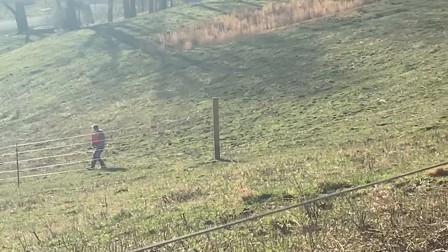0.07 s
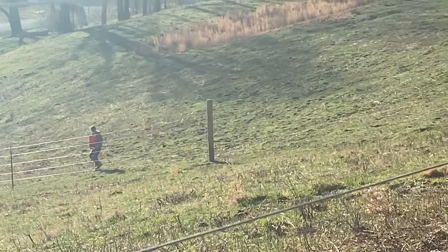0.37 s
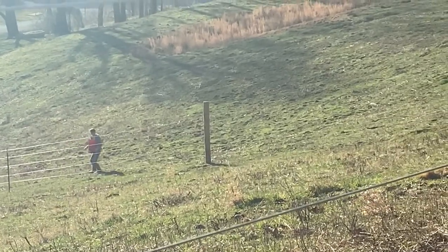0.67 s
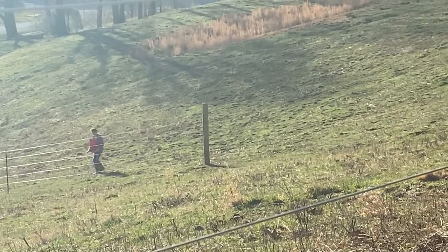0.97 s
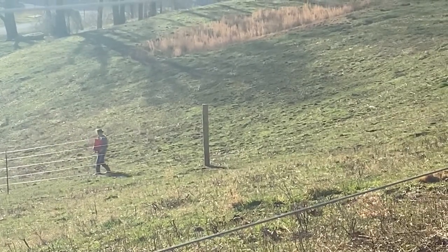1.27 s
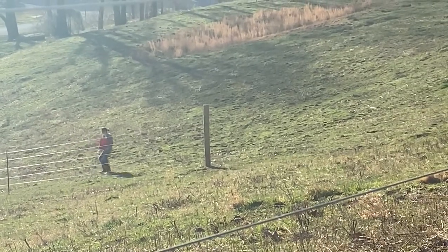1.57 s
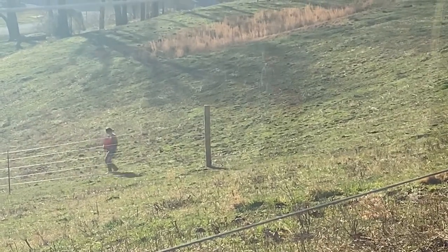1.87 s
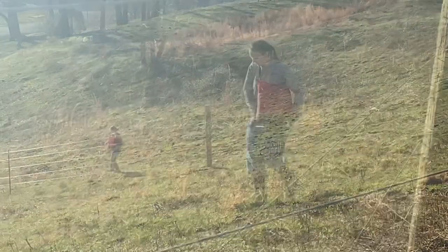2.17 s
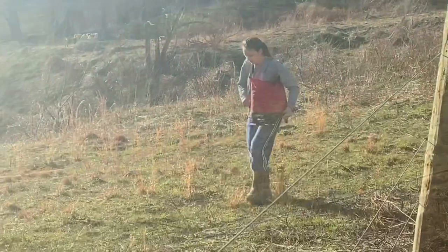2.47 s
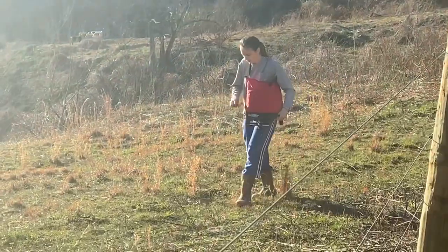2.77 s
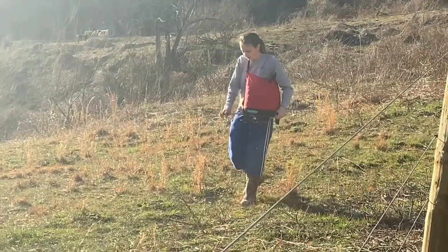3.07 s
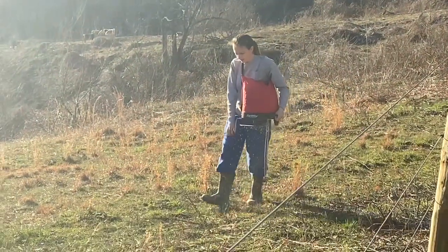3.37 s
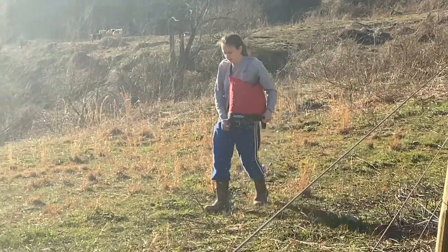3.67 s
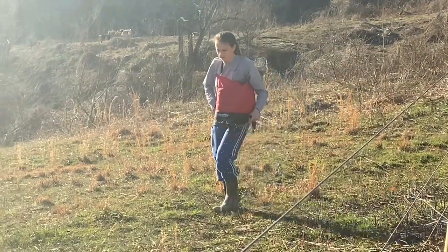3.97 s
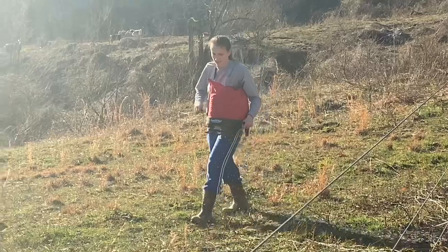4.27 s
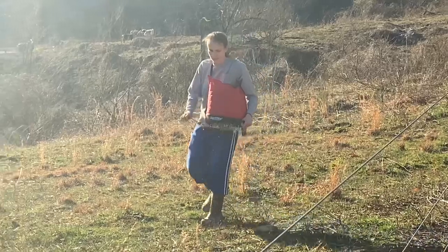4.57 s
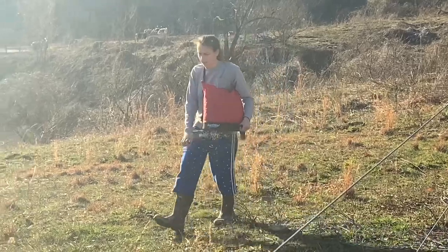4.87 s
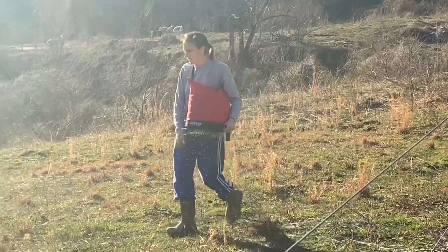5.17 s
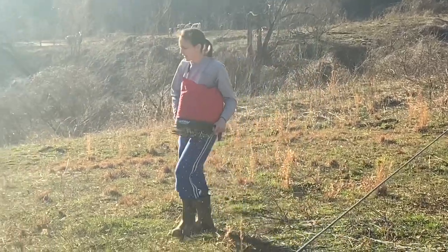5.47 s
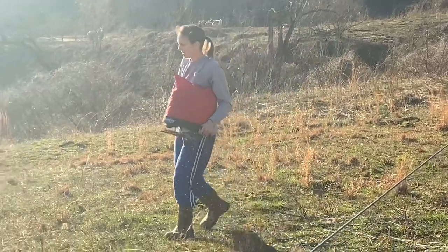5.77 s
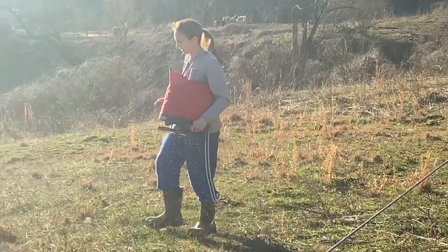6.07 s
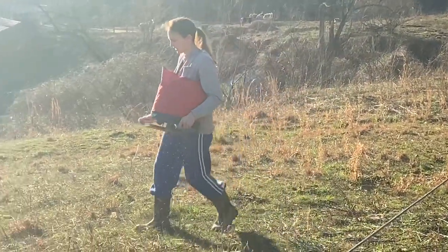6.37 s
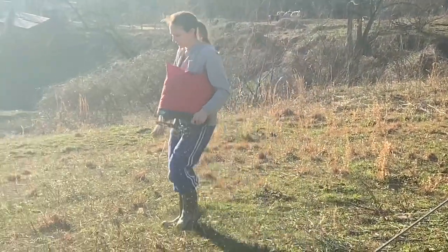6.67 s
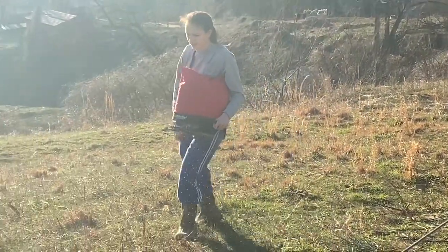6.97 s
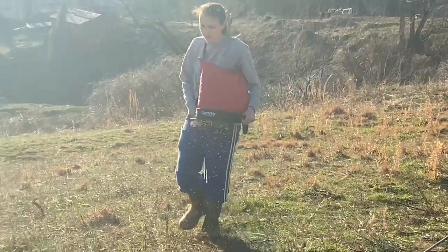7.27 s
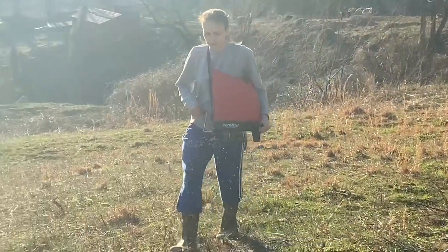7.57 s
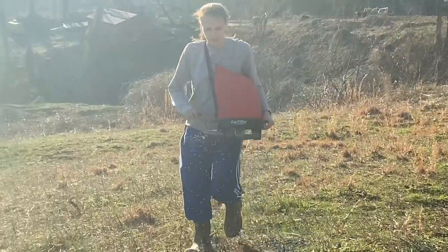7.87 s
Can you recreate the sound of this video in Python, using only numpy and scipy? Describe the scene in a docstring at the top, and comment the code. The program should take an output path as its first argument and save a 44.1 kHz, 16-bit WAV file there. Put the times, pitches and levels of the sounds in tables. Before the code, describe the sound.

In an open pasture, wind rumbles softly on the microphone while a hand-cranked seed spreader is barely heard far off. After about two seconds it is suddenly nearer: a grainy hiss with sharp ticks of seed on plastic and a faint gear whirr, growing louder. Distant tyres roar, an engine hums and a bird chirps faintly. Near the end, strong gusts thump and pop on the microphone.

```python
"""A hand-cranked seed spreader, carried across a pasture, first far from the microphone, then near.
Seed sprays off its spinning disc as a grainy hiss with single sharp ticks, over the whirr of its gears.
Tyres roar on a distant road, an engine and a hollow drone hum far away, a bird chirps and dry grass stirs.
Wind buffets the microphone, hardest near the end, among footstep rustles and a few pops and knocks."""
import sys
import numpy as np
from scipy import signal
from scipy.fft import rfft, irfft, next_fast_len
from scipy.io import wavfile
from scipy.ndimage import uniform_filter1d, map_coordinates

SR = 44100
rng = np.random.default_rng(int(sys.argv[2]) if len(sys.argv) > 2 else 0)


def generate_wav(sig):
    """Save sig (samples, or channels by samples) to the path in sys.argv[1] as 16-bit PCM at SR."""
    pcm = np.round(np.clip(np.atleast_2d(sig).T, -1, 1) * 32767).astype(np.int16)
    wavfile.write(sys.argv[1], SR, pcm)


N = 358091
TOP_HZ = 15800  # upper band limit


def amp(db):
    """Decibels to gain."""
    return 10 ** (np.asarray(db) / 20)


def unit(x):
    """Scale to rms 1."""
    return x / np.sqrt(np.mean(x ** 2) + 1e-20)


def clock():
    """Time of every sample in seconds."""
    return np.arange(N) / SR


def curves(rows):
    """One value per sample for each column after the time."""
    times, *columns = np.transpose(rows)
    return [np.interp(clock(), times, column) for column in columns]


def wobble(rate):
    """A smooth random curve, rate knots a second."""
    knots = rng.standard_normal(int(N * rate / SR) + 4)
    return map_coordinates(knots, [np.arange(N) * rate / SR])


def swell(s, half):
    """A bell-shaped rise and fall around time s."""
    return np.exp(-np.minimum(((clock() - s) / half) ** 2 / 2, 50))


def with_swells(steady, rows):
    """A gain with (time_s, half_length_s, level_db) swells added in power."""
    return np.sqrt(steady ** 2 + sum((amp(db) * swell(s, half)) ** 2 for s, half, db in rows))


def filtered(x, response):
    """x through a filter given as a function of frequency."""
    size = next_fast_len(N + 8192)
    return irfft(rfft(x, size) * response(np.fft.rfftfreq(size, 1 / SR)), size)[..., :N]


def coloured(x, points):
    """x shaped by a (frequency_hz, gain_db) spectrum, at rms 1."""
    points_hz, db = np.transpose(points)
    return unit(filtered(x, lambda hz: amp(np.interp(np.log(hz + 1), np.log(points_hz), db))))


def hump(hz, centre, width):
    """A resonance applied twice, for steep sides."""
    return (hz * width) ** 2 / ((centre ** 2 - hz ** 2) ** 2 + (hz * width) ** 2)


def noise(side_db, size=N):
    """Stereo white noise; side_db sets how much the channels differ."""
    mid, side = rng.standard_normal((2, size))
    return unit(np.array([mid + amp(side_db) * side, mid - amp(side_db) * side]))


def patchy(x, depth_db):
    """Brief, narrow patches of the spectrum grow louder or softer at random."""
    spectra = signal.stft(x, nperseg=1024)[2]
    patches = uniform_filter1d(rng.standard_normal(spectra.shape[1:]), size=5, axis=0)
    patches = unit(uniform_filter1d(patches, size=3, axis=1))
    return unit(signal.istft(spectra * amp(depth_db * patches), nperseg=1024)[1][:, :N])


def hand_push(lag_s=0, hardest_s=5.05, turn_s=0.757):
    """The hand's effort over each turn of the crank, from -1 to 1."""
    return np.cos(2 * np.pi * (clock() - hardest_s - lag_s) / turn_s)


# Breeze at the microphone, lulling midway and freshening near the end: time_s, level_db
BREEZE = [(0, -47), (1.4, -46.5), (2.5, -57.5), (4.3, -59), (5.3, -52), (6.15, -56.5), (6.85, -40.5),
          (7.45, -37), (8.12, -46.5)]
# Gusts that rise out of it: time_s, level_db
BREEZE_GUSTS = [(.5, -44), (2.58, -52), (3.15, -50), (3.5, -51), (3.96, -46.5), (4.75, -43.5),
                (5.15, -43.5), (5.56, -50), (5.76, -47), (6.33, -45), (6.8, -39), (7.05, -42.5),
                (7.31, -35.5), (7.85, -38.5)]
# Rumble of wind on the microphone: frequency_hz, gain_db
BUFFET_SPECTRUM = [(15, -56), (28, -40), (45, 1), (62, 3), (85, 2), (130, -4), (200, -18), (400, -43),
                   (1200, -106)]

def wind(lumps_db=2.0, gust_half_s=0.059, churn_db=-38.5, churn_growth=1.88, churn_hz=165):
    """Low, lumpy pressure on the microphone, which churns higher as the wind grows."""
    strength = with_swells(amp(curves(BREEZE)[0]), [(s, gust_half_s, db) for s, db in BREEZE_GUSTS])
    rumble = coloured(noise(side_db=-9), BUFFET_SPECTRUM)
    churn_band = lambda hz: hump(hz, churn_hz, width=240) / (1 + (hz / (2 * churn_hz)) ** 2)
    churn = unit(filtered(noise(side_db=-3.5), churn_band))
    churn_gain = amp(churn_db) * (strength / strength.max()) ** churn_growth
    return amp(lumps_db * wobble(20)) * (strength * rumble + churn_gain * churn)


# Low tyre roar of the far road: time_s, level_db
ROAD_LEVEL = [(0, -71.5), (1.7, -69), (2.5, -57), (3.2, -54.5), (3.8, -49.5), (4.8, -48.5), (5.7, -52.5),
              (7.15, -50.5), (7.7, -54.5), (8.12, -51)]
# Single vehicles passing on it: time_s, half_length_s, middle_db, high_db
PASSING_VEHICLES = [(1.55, 0.18, -62.5, -90), (2.22, 0.18, -70, -59.5), (2.697, 0.25, -60.5, -59.5),
                    (3.932, 0.29, -52.5, -70), (4.33, .1, -70, -58), (5.657, 0.4, -48, -70),
                    (6.214, 0.16, -47.5, -61)]
# Open air over the pasture, then the three bands of tyre roar: frequency_hz, gain_db
AIR_SPECTRUM = [(25, -20.5), (60, -3.5), (110, -4.5), (170, -6.5), (260, -16), (380, -21.5), (480, -22),
                (620, -19), (820, -17), (1000, -17), (1300, -24), (2000, -27), (2800, -34), (4000, -48),
                (7000, -61), (15500, -72)]
ROAR_LOW = [(350, -23.5), (480, -14), (620, -9.5), (730, -3.5), (835, -0.5), (920, -6), (1100, -23.5),
            (1600, -41.5)]
ROAR_MIDDLE = [(600, -18), (850, -8), (980, 9.5), (1150, 9), (1380, 5.5), (1550, -14.5), (2300, -44.5)]
ROAR_HIGH = [(1000, -28), (1300, -6.5), (1430, 10), (1630, 6.5), (1800, -2), (2200, -17), (3200, -51)]

def traffic(air_db=-52, middle_db=-55.5, high_db=-61, flicker_db=1, drift_db=1.34):
    """Distant tyres roar in three bands over steady outdoor air; single vehicles lift the upper two."""
    road_db, = curves(ROAD_LEVEL)
    lull_db = road_db - road_db.max()
    middle_swells = [(s, half, db) for s, half, db, _ in PASSING_VEHICLES]
    high_swells = [(s, half, db) for s, half, _, db in PASSING_VEHICLES]
    middle = with_swells(amp(middle_db + 0.41 * lull_db), middle_swells)
    high = with_swells(amp(high_db + 0.63 * lull_db), high_swells)
    out = amp(air_db) * coloured(noise(side_db=-11), AIR_SPECTRUM)
    for gain, spectrum in ((amp(road_db), ROAR_LOW), (middle, ROAR_MIDDLE), (high, ROAR_HIGH)):
        waver = amp(flicker_db * wobble(30) + drift_db * wobble(5))
        out += gain * waver * coloured(noise(side_db=-30), spectrum)
    return out


# Faint stirs in the dry pasture grass: time_s, level_db, half_length_s
GRASS_RUSTLES = [(.08, -72, 0.11), (0.31, -72, 0.017), (1.216, -71.5, .03), (1.698, -74.5, 0.16),
                 (2.12, -73, .04), (2.25, -69, .006)]
# Colour of the stalks: frequency_hz, gain_db
GRASS_SPECTRUM = [(1500, -34), (2800, 2), (4200, -1), (5500, -12), (8000, -26)]

def grass(crinkle_db=3):
    """Stalks rub together in brief, crinkly swells."""
    gain = sum(amp(db) * swell(s, half) for s, db, half in GRASS_RUSTLES)
    crinkle = amp(crinkle_db * wobble(200)) * noise(side_db=2.5)
    return gain * coloured(crinkle, GRASS_SPECTRUM)


# Coarse spray, jumping from far to near, then growing as it nears the microphone: time_s, level_db
SPRAY_LEVEL = [(2.3, -110), (2.39, -80), (2.95, -78.5), (3.3, -73.5), (4.8, -67.5), (5.1, -64), (7.2, -61),
               (8.12, -61.5)]
# Brief swells of grainy hiss, far seed early and footstep rustles later: time_s, boost_db, half_length_s
HISS_SWELLS = [(.19, 17.5, .025), (1.28, 10.5, .04), (1.602, 15, .05), (5.072, 7.5, 0.012),
               (5.27, 0, 0.035), (6.075, 5, 0.016), (7.903, 4, 0.013)]
# Coarse seed, then fine fizz: frequency_hz, gain_db
SEED_SPECTRUM = [(700, -31), (2000, -3), (3500, -3.5), (4800, -1), (6800, 0), (8500, -4.5), (11000, -10),
                 (15500, -31)]
FIZZ_SPECTRUM = [(3500, -12.5), (6500, -27), (8500, -6.5), (11200, -4.5), (13500, -2), (15000, -3),
                 (15800, -3.5)]

def seed_spray(grain_db=-3, hiss_db=-3, flutter_db=1.7):
    """Seed flows off the disc in small clumps; the finest grains merge into a shimmering hiss."""
    patter = amp(grain_db) * seed_patter()
    hiss = amp(hiss_db) * patchy(noise(side_db=-17), depth_db=2.6)
    surge_db = flutter_db * wobble(60) + sum(db * swell(s, half) for s, db, half in HISS_SWELLS)
    return sum(amp(level_db + surge_db) * coloured(patter + hiss, spectrum)
               for level_db, spectrum in zip(spray_levels(), (SEED_SPECTRUM, FIZZ_SPECTRUM)))


def seed_patter(seeds_per_s=4600, spread_db=3, typical_decay_s=0.00036, lowest_hz=1500):
    """Every seed lands as a tiny ring with its own force, pitch and decay."""
    start, pitch, force, lasting = rng.random((int(seeds_per_s * N / SR), 4)).T[:, :, None]
    t = np.arange(SR // 500) / SR
    gain = amp(spread_db * np.minimum(-np.log(1 - force), 5))
    pitch_hz = lowest_hz + pitch * (TOP_HZ - lowest_hz)
    decay_s = typical_decay_s * 3 ** (2 * lasting - 1)
    rings = gain * np.sin(2 * np.pi * pitch_hz * t) * np.exp(-t / decay_s)
    samples = (start * N).astype(int) + np.arange(len(t))
    return unit(np.bincount(samples.ravel(), rings.ravel(), N)[:N])


def spray_levels(near_s=2.32, rise_s=0.02, near_fizz_db=-60, far_fizz_db=-104, push_db=0.2):
    """Levels in dB of coarse seed and fine fizz; both follow the approach and lag each push."""
    seed_db, = curves(SPRAY_LEVEL)
    near = np.clip((clock() - near_s) / rise_s, 0, 1)  # fizz carries only from close by
    bright_db = 8.5 * swell(2.5, half=0.17)  # it sets in with a brief bright swell
    close_db = near_fizz_db + 0.51 * (seed_db - seed_db.max()) + bright_db
    fizz_db = near * close_db + (1 - near) * far_fizz_db
    return np.array([seed_db, fizz_db]) + push_db * hand_push(lag_s=0.22)


def stray_strikes(per_s=4, above_spray_db=23, spread_db=3.5):
    """Lighter seed strikes at random times, following the spray's level: start_s, strength_db."""
    when, force = rng.random((int(per_s * N / SR), 2)).T
    start_s = when * N / SR
    spray_db = np.interp(start_s, *np.transpose(SPRAY_LEVEL))
    return list(zip(start_s, spray_db + above_spray_db + spread_db * (2 * force - 1)))


# The hardest seeds that strike the spreader's plastic: start_s, strength_db
HARD_STRIKES = [(1.294, -56), (1.896, -54.5), (3.1294, -43.5), (4.2097, -39), (4.26, -38), (5.0943, -36.5),
                (5.171, -32.5), (5.2679, -30), (5.3064, -34), (5.474, -31.5), (6.114, -30.5),
                (6.161, -30.5), (6.198, -31.5), (6.3789, -33), (6.633, -33), (7.007, -30.5), (7.287, -30),
                (7.509, -36)]

def seed_ticks(t60_s=0.0035, scatter_t60_s=0.04, scatter_db=-21, boost_db=3, colour_db=3):
    """Each seed hitting plastic is a short crack with its own colour, followed by a little scatter."""
    out, t = np.zeros(N + SR), np.arange(SR // 10) / SR
    hz = np.fft.rfftfreq(len(t), 1 / SR)
    fade = amp(-60 * t / t60_s) + amp(scatter_db - 60 * t / scatter_t60_s)
    for s, db in HARD_STRIKES + stray_strikes():
        colour = amp(colour_db * np.interp(hz, np.linspace(0, TOP_HZ, 10), rng.standard_normal(10)))
        crack = fade * irfft(rfft(rng.standard_normal(len(t))) * colour, len(t))
        out[round(s * SR):][:len(t)] += amp(db + boost_db) * crack / np.abs(crack).max()
    return filtered(out[:N], lambda hz: hz ** 2 / (hz ** 2 + 3500 ** 2))  # high-pass


# A far engine that speeds up near the end, then a second, fainter note: time_s, pitch_hz, level_db
ENGINE_NOTE = [(1.9, 99.9, -80), (2.5, 100.7, -52.5), (4.1, 100, -50.5), (5.15, 99.8, -42), (6.0, 100, -53),
               (6.4, 100.5, -40.5), (6.8, 108.2, -39), (7.2, 110.1, -50.5), (8.1, 111.6, -49.5)]
FAINT_ENGINE_NOTE = [(2.1, 152.4, -81), (2.6, 152.2, -52), (4.1, 149.9, -56.5), (4.8, 136, -50.5),
                     (5.7, 136.4, -51.5), (6.3, 137.2, -89)]
# Harmonics of either note: pitch_multiple, gain_db
ENGINE_HARMONICS = [(1, 0), (2, -29)]

def engine(track, waver_db=1.3):
    """A far engine's firing note wavers in the moving air."""
    pitch_hz, level_db = curves(track)
    phase = 2 * np.pi * np.cumsum(pitch_hz * (1 + 0.006 * wobble(10))) / SR
    note = sum(amp(db) * np.sqrt(2) * np.sin(k * phase) for k, db in ENGINE_HARMONICS)
    return amp(level_db + waver_db * wobble(7.3)) * note


# A hollow drone from far away: time_s, level_db
DRONE_LEVEL = [(1.9, -68.5), (2.45, -49), (3.55, -45), (4.7, -51.5), (6.2, -62), (6.7, -54.5),
               (8.12, -50.5)]
# Its resonances: centre_hz, width_hz, gain_db
DRONE_RESONANCES = [(159, 33, 0), (206, 13.6, 3), (242.3, 15, 2), (288, 13, 0.5)]
# Its broad bed: frequency_hz, gain_db
DRONE_SPECTRUM = [(70, -11.5), (130, -4), (170, -1), (240, 3), (300, -1.5), (360, -5.5), (450, -24.5),
                  (800, -50)]

def drone(tones_db=-4, bed_db=-3):
    """A few fuzzy low tones stand in a bed of distant rumble."""
    peaks = lambda hz: sum(amp(db) * hump(hz, centre, width) for centre, width, db in DRONE_RESONANCES)
    tones = unit(filtered(noise(side_db=-29), peaks))
    bed = coloured(noise(side_db=-15), DRONE_SPECTRUM)
    return amp(curves(DRONE_LEVEL)[0]) * (amp(tones_db) * tones + amp(bed_db) * bed)


# The spreader's gears as it comes closer: time_s, mesh_hz, level_db
GEAR_MESH = [(2.0, 1010, -89), (3.3, 1009, -72.5), (4.9, 1010, -68.5), (5.7, 952, -67.5), (6.5, 955, -65.5),
             (7.3, 978, -73), (8.12, 1010, -71)]
# Overtones of the meshing teeth: mesh_multiple, gain_db
GEAR_OVERTONES = [(2, 4), (3, -5)]

def gear_whirr(blur_hz=135, chatter_db=1, push_db=3):
    """Loose plastic gears give blurred, chattering overtones of the mesh rate, louder at each push."""
    mesh_hz, level_db = curves(GEAR_MESH)
    phase = 2 * np.pi * np.cumsum(mesh_hz * (1 + 0.008 * wobble(6))) / SR
    whirr = np.zeros(N)
    for k, db in GEAR_OVERTONES:
        rattle = unit(filtered(rng.standard_normal(N), lambda hz: 1 / (1 + (hz / blur_hz) ** 2)))
        whirr += amp(db) * np.sqrt(2) * rattle * np.sin(k * phase)
    return amp(level_db + push_db * hand_push() + chatter_db * wobble(120)) * whirr


# The hardest eddies that hit the microphone: time_s, level_db, half_length_s, centre_hz
WIND_EDDIES = [(2.147, -38.5, 0.0087, 88), (5.153, -39, 0.027, 113), (5.559, -37.5, 0.014, 120),
               (5.768, -39, 0.023, 151), (6.775, -37, 0.016, 140), (7.043, -25.5, .011, 168),
               (7.216, -35, 0.014, 180), (7.291, -32, .012, 126), (7.318, -27, .014, 202),
               (7.44, -38, 0.013, 267), (7.534, -40, .023, 285), (7.585, -29, 0.0058, 160),
               (7.783, -39, .02, 161), (7.858, -36.5, .016, 150), (7.887, -37, 0.0076, 262)]

def eddies(relative_width=0.95):
    """Short, round puffs of air, each thudding with its own length and pitch."""
    out, t = np.zeros((2, N + SR)), np.arange(SR // 4) / SR - 1 / 8
    hz = np.fft.rfftfreq(len(t), 1 / SR)
    for s, db, half, centre_hz in WIND_EDDIES:
        bell = np.exp(-(t / half) ** 2 / 2)
        colour = hump(hz, centre_hz, relative_width * centre_hz) / (1 + (hz / (2.13 * centre_hz)) ** 4)
        puff = bell * irfft(rfft(noise(side_db=-7, size=len(t))) * colour, len(t))
        start = round((s + t[0]) * SR)
        out[:, start:start + len(t)] += amp(db) * unit(puff) * np.sqrt(np.mean(bell ** 2))
    return out[:, :N]


# A bird far across the pasture: start_s, length_s, top_pitch_hz, fall_hz, level_db
BIRD_CHIRPS = [(2.685, 0.026, 3100, 60, -71), (2.737, 0.017, 3040, 60, -65), (3.247, 0.075, 3060, 600, -64),
               (3.56, 0.048, 3150, 200, -68)]

def bird(rasp=0.025):
    """Short, slightly raspy whistles that arch and fall."""
    out = np.zeros(N)
    for s, length, top_hz, fall_hz, db in BIRD_CHIRPS:
        progress = np.linspace(0, 1, round(length * SR))
        arch_hz = top_hz - fall_hz * ((3 * progress - 1) / 2) ** 2
        pitch_hz = arch_hz * (1 + rasp * wobble(400)[:len(progress)])
        whistle = np.sqrt(2) * np.sin(2 * np.pi * np.cumsum(pitch_hz) / SR)
        out[round(s * SR):][:len(whistle)] += amp(db) * np.sin(np.pi * progress) * whistle
    return out


def housing_clack(start_s=4.2615, ring_hz=4350, t60_s=0.014, level_db=-43):
    """One hard knock makes the spreader's plastic housing ring briefly."""
    t = np.maximum(clock() - start_s, 0)
    return amp(level_db - 60 * t / t60_s) * np.sin(2 * np.pi * ring_hz * t)


# Abrupt pops and small knocks: time_s, peak_db, centre_hz
POPS_AND_KNOCKS = [(4.2622, -34, 4730), (4.675, -33, 600), (7.046, -25, 159), (7.311, -28, 420),
                   (7.4995, -33.5, 450), (7.521, -37, 1640), (7.535, -29, 499), (7.579, -29.5, 215),
                   (7.863, -25, 190)]

def pops():
    """Each pop or knock is one quick push and pull of pressure; the first one, at 4.26 s, is the hard knock on
    the spreader's plastic housing."""
    out = np.zeros(N)
    for s, db, centre_hz in POPS_AND_KNOCKS:
        phase = np.clip(2 * np.pi * centre_hz * (clock() - s), -10, 10)
        out -= amp(db) * phase * np.exp((1 - phase ** 2) / 2)
    return out


def scene():
    """The spreader in front, open country around it, wind right on the microphone."""
    spreader = seed_spray() + seed_ticks() + housing_clack() + gear_whirr()
    country = traffic() + engine(ENGINE_NOTE) + engine(FAINT_ENGINE_NOTE) + drone() + bird() + grass()
    return spreader + country + wind() + eddies() + pops()


# Stereo width of the overall sound, nearly mono from about 2 to 5 kHz: frequency_hz, side_gain_db
STEREO_WIDTH = [(25, 3), (70, -7), (150, -4), (300, 0.5), (600, 7), (1600, 8), (2000, -0.5), (2400, -19),
                (3900, -30), (5000, -21.5), (15800, 3)]
# Phase between the two channels: frequency_hz, phase_rad
CHANNEL_PHASE = [(7300, 0), (7800, -1.4), (9050, -3.14), (10150, -4.7), (11150, -6.28), (12200, -7.85),
                 (13350, -9.42), (14400, -11), (15400, -12.57), (16200, -13.6)]

def record(dry):
    """The sound is nearly mono from about 2 to 5 kHz, parts in phase in the treble and is band-limited."""
    side = filtered((dry[0] - dry[1]) / 2, lambda hz: amp(np.interp(hz, *np.transpose(STEREO_WIDTH))))
    pair = dry.mean(axis=0) + np.array([side, -side])
    turn = lambda hz: np.interp(hz, *np.transpose(CHANNEL_PHASE)) / 2
    return filtered(pair, lambda hz: np.exp(1j * np.array([turn(hz), -turn(hz)])) * (hz < TOP_HZ))


dry = scene()
out = record(dry)
generate_wav(out)
```